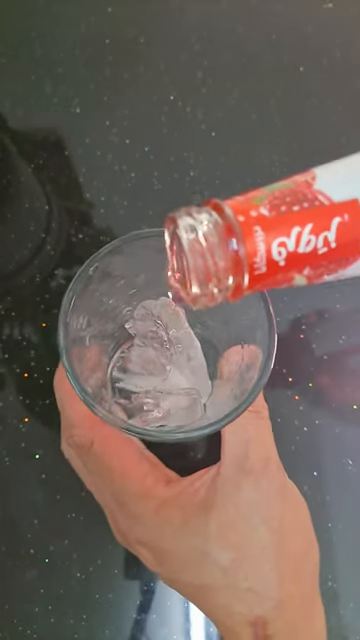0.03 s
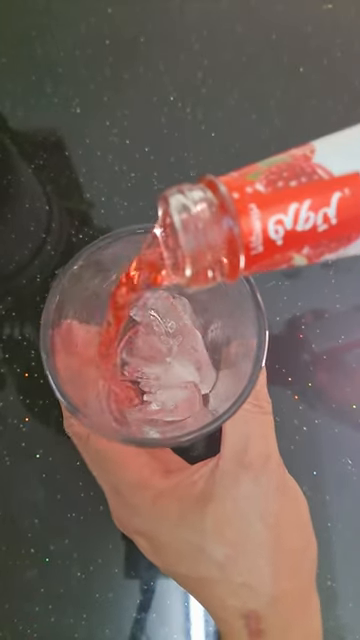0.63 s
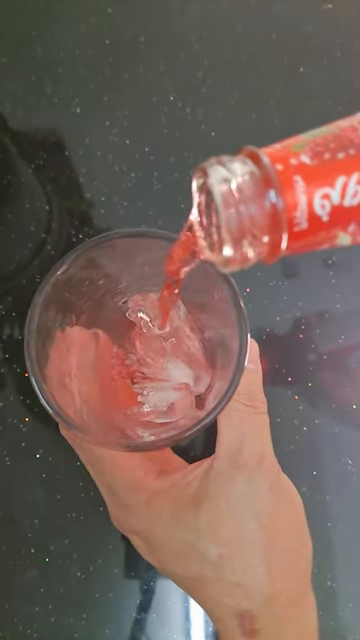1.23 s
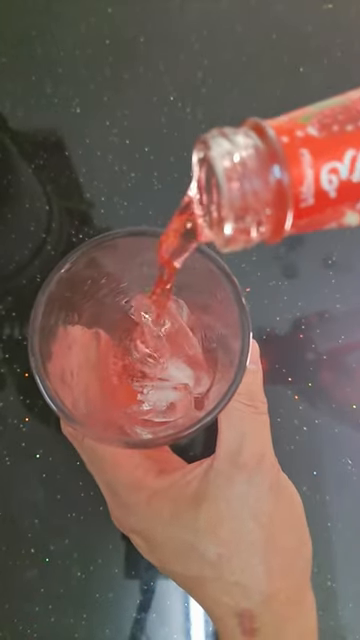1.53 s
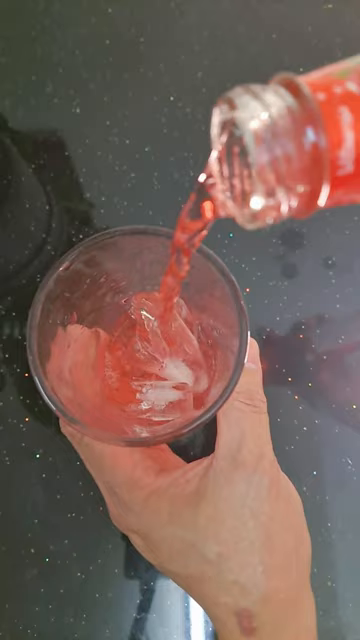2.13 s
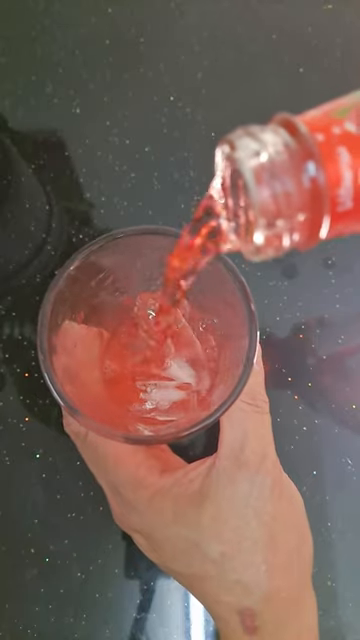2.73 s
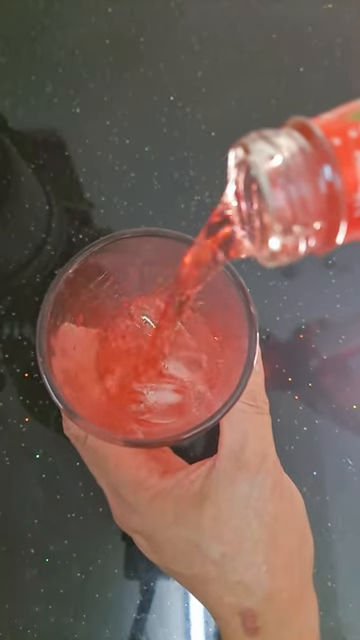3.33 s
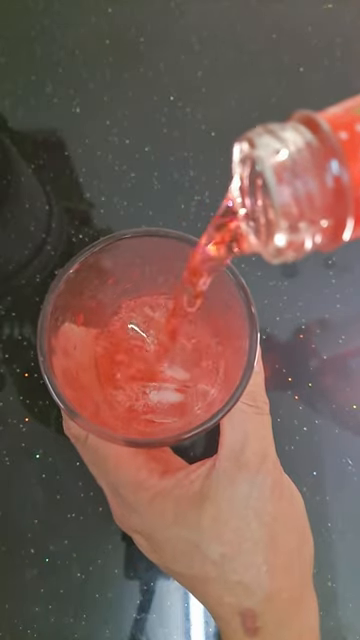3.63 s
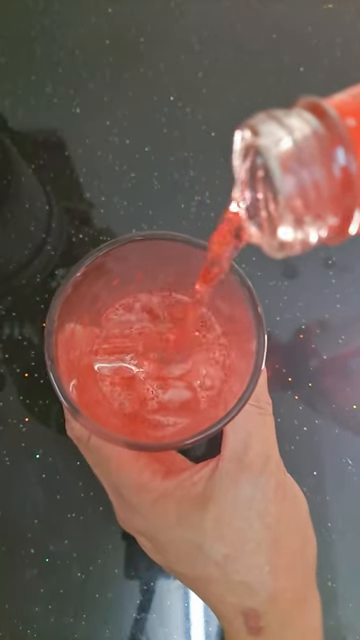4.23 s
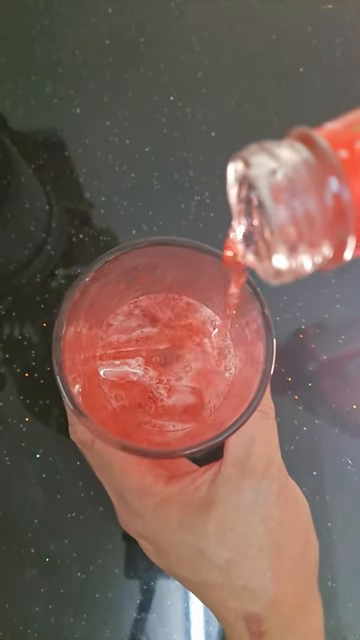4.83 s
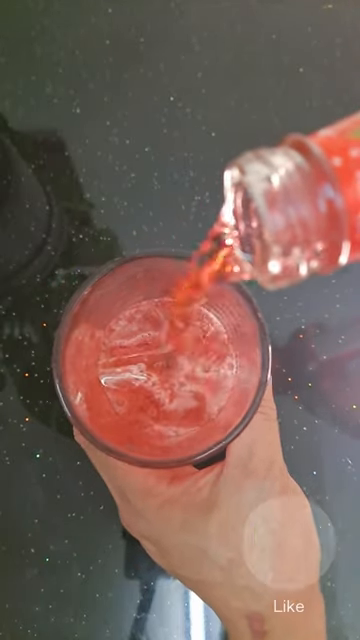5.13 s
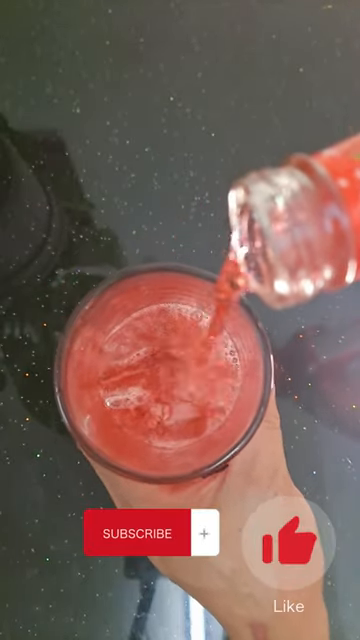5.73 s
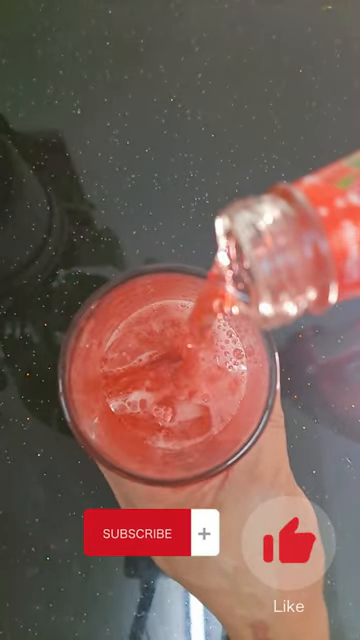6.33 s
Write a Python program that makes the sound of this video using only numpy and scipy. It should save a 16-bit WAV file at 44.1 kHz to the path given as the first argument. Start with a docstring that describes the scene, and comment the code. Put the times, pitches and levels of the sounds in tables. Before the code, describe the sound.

Close, uneven pouring of a soft drink into a glass of ice, with gurgles and fizz over a faint appliance hum.

```python
"""In a small room, a soft drink is poured in a thin, surging stream over ice into a hand-held glass.
Trapped air pockets ring as damped oscillators: large ones gurgle, tiny ones tick and fizz. Bubbles and
splashes drive the air column above the drink, whose resonances climb as the filling glass shortens it.
An appliance motor beats against the mains hum, and the walls add a brief reverberation."""
import sys
import numpy as np
from scipy import signal
from scipy.fft import rfft, irfft, next_fast_len
from scipy.io import wavfile
from scipy.ndimage import uniform_filter1d

SR = 44100
rng = np.random.default_rng(int(sys.argv[2]) if len(sys.argv) > 2 else 0)


def store_pcm(level_fs):
    """Save levels as 16-bit WAV."""
    pcm = np.round(np.clip(level_fs, -1, 1) * 32767).astype(np.int16)
    wavfile.write(sys.argv[1], SR, np.atleast_2d(pcm).T)


N = 280917

# prominent large bubbles: (time [s], level [dB], pitch [Hz], t60 [s])
LARGE_BUBBLES = [(0.5024, -13.5, 760, 0.034), (0.5127, -24, 880, .024), (0.5243, -33, 985, .04),
                 (0.5593, -33, 1210, .048), (0.61, -37, 1480, .06), (0.6765, -29, 1590, 0.016),
                 (0.698, -29.5, 1493, 0.04), (0.735, -30.5, 1526, 0.047), (0.829, -40, 850, .052),
                 (0.9428, -23, 823, 0.039), (0.9637, -22.5, 884, 0.043), (1.0667, -22.5, 848, 0.043),
                 (1.0945, -27.5, 820, 0.048), (1.196, -21.5, 843, 0.1), (1.2187, -20.5, 830.7, 0.12),
                 (1.234, -23, 840, 0.041), (1.3769, -31, 846, 0.025), (1.7802, -21, 894, 0.025),
                 (1.8849, -30, 883, .037), (1.897, -27, 883, .07), (1.9271, -20.5, 853, 0.022),
                 (2.791, -23.5, 960, 0.019), (2.8014, -20, 985, 0.029), (2.8444, -30, 915, .034),
                 (2.9387, -20, 1010, 0.017), (2.9906, -30, 963, 0.033), (3.179, -30, 967, 0.024),
                 (3.1999, -25.5, 1030, 0.0093), (3.6896, -17, 1117, .013), (3.979, -20, 970, 0.015),
                 (4.064, -15.5, 976, 0.014), (4.1284, -24.5, 990, .009), (4.3961, -15, 1202, 0.015),
                 (4.6248, -23.5, 885, 0.015), (4.6433, -19, 1160, 0.023), (4.7237, -24, 1410, .0095),
                 (4.814, -16, 1110, 0.009), (4.8985, -11.5, 1050, 0.0076), (4.918, -16, 1180, 0.022),
                 (4.9287, -15.5, 890, .01), (4.9454, -9, 1110, 0.0077), (4.9707, -19, 1320, .006),
                 (5.1871, -20.5, 1160, 0.008), (5.2051, -27.5, 907, 0.023), (5.2762, -23.5, 1390, 0.0042),
                 (5.3572, -23.5, 837, 0.016), (5.3585, -26.5, 412, 0.02), (5.7086, -22, 1460, 0.0093),
                 (5.8165, -30, 680, .032), (5.8428, -20, 1390, 0.0075), (5.8653, -21, 1230, .0045),
                 (5.942, -22, 1310, 0.014)]
# air column above ice and drink: (time [s], first resonance [Hz], second resonance [Hz])
COLUMN_MODES = [(.5, 780, 1490), (.78, 840, 1560), (.97, 822, 1830), (1.25, 785, 1940), (1.9, 880, 1990),
                (2.6, 940, 2400), (2.85, 1006, 2470), (3.25, 1060, 2550), (3.75, 1160, 2670),
                (4.4, 1235, 3040), (5, 1248, 3250), (5.7, 1430, 3630), (6.37, 1550, 3460)]
# faint noise of the room: (frequency [Hz], relative density [dB])
AMBIENT_SPECTRUM = [(59, -25), (100, -5.5), (177, -14), (306, -18), (448, -30), (566, -28.5), (863, -27),
                    (1210, -40), (1340, -33.5), (2050, -44), (2880, -52), (6420, -44.5), (7140, -42),
                    (7770, -41.5), (11000, -52), (15600, -53)]


def amp(db):
    """Amplitude ratio: a factor of ten for every 20 dB."""
    return 10 ** (np.asarray(db) / 20)


def along(points, hz):
    """Interpolation of (frequency [Hz], value) points on a logarithmic frequency axis."""
    f, v = np.transpose(points)
    return np.interp(np.log(hz + 1), np.log(f + 1), v)


def curves(rows):
    """Linear interpolation in time: one value per sample for each column after the first."""
    times, *columns = np.transpose(rows)
    return [np.interp(np.arange(N) / SR, times, column) for column in columns]


def filtered(x, response):
    """Linear filtering: the spectrum of x is multiplied by a frequency response."""
    size = next_fast_len(N + SR // 2)
    return irfft(rfft(x, size) * response(np.fft.rfftfreq(size, 1 / SR)), size)[..., :N]


def noise(spectrum):
    """Spectral shaping turns white noise into coloured noise of rms 1."""
    x = filtered(rng.standard_normal(N), lambda hz: amp(along(spectrum, hz)))
    return x / np.sqrt(np.mean(x ** 2) + 1e-20)


def resonate(x, hz, width_hz):
    """Forced response of a damped resonator of gain 1 whose centre may glide."""
    turn = np.exp(2j * np.pi * np.cumsum(hz * np.ones(N)) / SR)
    pole = np.exp(-np.pi * width_hz / SR)
    return 2 * (turn * signal.lfilter([1 - pole], [1, -pole], x / turn)).real


def place(times, sounds):
    """Superposition of short sounds, one a row, each from its own onset."""
    at = np.round(np.maximum(times, 0) * SR).astype(int) + np.arange(sounds.shape[1])
    return np.bincount(at.ravel(), sounds.ravel(), N)[:N]


def steady(x, span_s):
    """Division by the running rms holds the level near 1; faster grain stays."""
    size = int(span_s * SR) + 1
    power = np.abs(uniform_filter1d(uniform_filter1d(x ** 2, size), size))
    return x / np.sqrt(power + 0.058 * power.mean())


def motor_and_ambience():
    """Beating: motor and mains tones lie close in frequency, over a low rumble and faint hiss."""
    # motor and mains partials: (frequency [Hz], rms level [dB])
    partials = [(58.6, -42), (60.3, -36), (117.2, -48), (120, -47), (175.8, -57.5), (237, -58.5),
                (293, -56), (586, -69)]
    # low rumble: (frequency [Hz], relative density [dB])
    rumble_spectrum = [(18, -40), (27, -17), (40, -17.5), (54, 3.5), (72, 0.5), (92, -11), (110, -23.5),
                       (160, -37), (300, -88)]
    t = np.arange(N) / SR
    hum = sum(np.sqrt(2) * amp(db) * np.sin(2 * np.pi * (hz * t + rng.random())) for hz, db in partials)
    return hum + amp(-36) * noise(rumble_spectrum) + amp(-46.5) * noise(AMBIENT_SPECTRUM)


def flow_levels():
    """Incoherent sources add in power: surges over a trickle give gurgle, splash and fizz levels in dB."""
    # surges of the uneven stream: (start [s], length [s], gurgle [dB], splash [dB], fizz [dB])
    surges = [(0.444, 0.058, -46, -58, -47), (0.524, 0.15, -44, -51, -53), (0.67, 0.15, -44, -59, -60),
              (0.939, 0.042, -36, -40.5, -46), (1.034, 0.11, -41.5, -48.5, -51),
              (1.202, 0.03, -46.5, -38.5, -50), (1.701, 0.082, -51, -49, -53),
              (1.881, 0.022, -37, -37.5, -36.5), (2.135, 0.084, -50, -61, -60),
              (2.593, 0.022, -66, -50, -71), (2.761, 0.15, -44, -51.5, -50.5), (2.99, 0.11, -47, -50, -55),
              (3.127, 0.10, -44, -47.5, -59), (3.451, 0.13, -54, -61, -54.5),
              (3.636, 0.09, -54.5, -52, -51.5), (3.841, 0.051, -50, -60, -58),
              (3.972, 0.15, -41, -65.5, -61), (4.352, 0.04, -45.5, -68, -51), (4.404, 0.16, -38, -52, -51),
              (4.601, 0.20, -39, -49.5, -55.5), (4.81, 0.073, -40.5, -47.5, -61.5),
              (4.895, 0.11, -35, -47, -54), (5.184, 0.097, -45, -52, -53), (5.343, 0.091, -44, -56, -54),
              (5.546, 0.04, -45.5, -51.5, -59), (5.698, 0.06, -45, -50, -52), (5.81, 0.044, -35, -51, -64),
              (5.906, 0.088, -49.5, -50.5, -61), (6.314, 0.05, -47, -62, -65)]
    # thin stream between the surges: (time [s], gurgle [dB], splash [dB], fizz [dB])
    trickle = [(0.42, -79, -85, -78), (0.55, -55, -68, -61), (1.3, -56, -73, -64.5), (2.5, -70, -81, -63.5),
               (3.35, -67.5, -68, -63), (3.8, -51, -61, -55.5), (5.1, -57.5, -60.5, -55),
               (5.9, -51, -61, -55), (6.37, -59, -61.5, -58)]
    attack_s, sag_db_per_s = 0.007, 26.5  # a surge lands at once and weakens while it lasts
    release_db_per_s = (175, 229, 264)  # gurgle, splash, fizz
    t = np.arange(N) / SR
    power = amp(curves(trickle)) ** 2
    for start, length, *db in surges:
        on = (t > start) & (t < start + length + 0.5)
        age = t[on] - start
        release_db = np.outer(release_db_per_s, np.maximum(age - length, 0))
        fall_db = sag_db_per_s * (age - length / 2) + release_db
        power[:, on] += (np.minimum(age / attack_s, 1) * amp(np.array(db)[:, None] - fall_db)) ** 2
    return 10 * np.log10(power)


def ring(times, db, hz, t60, swell, rise, samples):
    """Damped bubble oscillation: each swells for a share of its t60 and decays as its pitch rises."""
    t = np.arange(samples) / SR
    envelope = (1 - np.exp(-t / (swell * t60))) * amp(-60 * t / t60)
    envelope /= envelope.max(axis=1, keepdims=True)
    gliding_hz = hz * (1 + rise * (np.minimum(t / t60, 1) - 1 / 5))
    phase = 2 * np.pi * np.cumsum(gliding_hz, axis=1) / SR
    return place(times, amp(db) * envelope * np.sin(phase))


def swarm(per_s, hz, spread, cycles, scatter_db):
    """Random superposition of bubbles, scattered in onset, pitch, decay time and level."""
    draw = np.clip(rng.standard_normal((int(per_s * N / SR), 3, 1)), -2, 2)
    times = rng.uniform(0, N / SR, (len(draw), 1))
    pitch = hz * np.exp(spread * draw[:, 0])
    t60 = cycles / pitch * 2 ** (draw[:, 1] / 2)
    return ring(times, scatter_db * draw[:, 2], pitch, t60, swell=0.032, rise=0.022, samples=800)


def column_strength():
    """A shallow cavity resonates weakly: the air column fades once the ice is covered."""
    return np.interp(np.arange(N) / SR, [3.1, 4.4], [1, 0.27])


def upper_modes(x, direct):
    """Cavity modes: the column's second resonance follows the filling; those across the glass stay put."""
    # resonances across the glass: (frequency [Hz], bandwidth [Hz], gain [dB])
    cross_modes = [(1955, 73, -6), (3480, 110, 1), (4860, 390, -11.5)]
    second = column_strength() * resonate(x, curves(COLUMN_MODES)[1], width_hz=160)
    return direct * x + second + sum(amp(db) * resonate(x, hz, width) for hz, width, db in cross_modes)


def stream(gurgle_db, splash_db, fizz_db):
    """Air entrainment: the stream traps swarms of bubbles, which drive the air in the glass."""
    # hiss of the froth: (frequency [Hz], relative density [dB])
    froth_spectrum = [(2500, -16), (3700, -12), (5000, 4), (6200, -0.5), (7800, -4), (9700, -11.5),
                      (11000, -23.5)]
    first_hz, second_hz = curves(COLUMN_MODES)
    strength = column_strength()
    large = swarm(per_s=280, hz=1150, spread=0.28, cycles=9.5, scatter_db=5.0)
    pockets = swarm(per_s=200, hz=410, spread=0.32, cycles=5.1, scatter_db=0.5)
    column = resonate(large, first_hz, width_hz=78)
    column += 0.83 * strength * resonate(large, second_hz, width_hz=87)
    # only a deep drink swallows big pockets of air
    gurgle = 0.2 * large + 0.19 * (1 - strength) * pockets + np.sqrt(strength) * column
    small = swarm(per_s=620, hz=2600, spread=0.25, cycles=21, scatter_db=4.5)
    splash = upper_modes(small, direct=0.14)
    tiny = swarm(per_s=750, hz=5836, spread=0.219, cycles=60, scatter_db=8.5)
    pops = steady(tiny + 0.27 * upper_modes(tiny, direct=0), span_s=0.26)
    froth = np.linspace(0.35, 0.62, N) * noise(froth_spectrum)  # froth builds up around the pops
    return (amp(gurgle_db - 0.42) * steady(gurgle, span_s=0.035)
            + amp(splash_db - 2.4) * steady(splash, span_s=0.035)
            + amp(fizz_db) * (0.57 * pops + froth))


def ticks(fizz_db):
    """Constant Q: small bubbles ring for the same number of cycles, so the highest are the briefest."""
    # clearest small bubbles: (time [s], level [dB], pitch [Hz])
    clear_ticks = [(0.4759, -22, 4710), (0.5088, -28, 4570), (0.6434, -30.5, 6740), (0.662, -35, 4000),
                   (0.9405, -31, 6500), (0.9672, -30, 1893), (1.0987, -30.5, 2000), (1.114, -31.5, 2010),
                   (1.215, -29, 6360), (1.2322, -30.5, 1780), (1.7815, -19.5, 2020), (1.898, -27.5, 1947),
                   (1.9108, -26.5, 2070), (2.3276, -39, 5300), (2.6086, -34.5, 7900), (2.6104, -41, 2400),
                   (2.7664, -36, 2480), (2.898, -26, 6660), (2.9947, -35, 2440), (3.0232, -36, 2770),
                   (3.0605, -36, 2330), (3.227, -37, 2640), (3.6445, -32, 6300), (4.1533, -30, 6600),
                   (4.3561, -33.5, 5030), (4.441, -29, 6500), (4.8987, -29, 1825), (4.9188, -32.5, 5150),
                   (4.9703, -28, 1920), (5.19, -29.5, 5050), (5.6997, -26, 6200)]
    strays_per_s, cycles = 12, 46
    at = rng.integers(0, N, int(strays_per_s * N / SR))
    draw = np.clip(rng.standard_normal((len(at), 2)), -2, 2)
    stray_db = fizz_db[at] + 10 + 2.5 * draw[:, 0]  # stray ticks stand out above the fizz
    stray_hz = 6000 * np.exp(0.15 * draw[:, 1])
    strays = np.column_stack([at / SR, stray_db, stray_hz])
    times, db, hz = np.vstack([clear_ticks, strays]).T[:, :, None]
    tone = ring(times, db - 0.3, hz, cycles / hz, swell=0.062, rise=0.02, samples=1500)
    return tone + 0.22 * upper_modes(tone, direct=0)


def large_bubbles():
    """Minnaert resonance: each large bubble pulsates and drives the air column's first mode."""
    times, db, hz, t60 = np.array(LARGE_BUBBLES).T[:, :, None]
    tone = ring(times, db - 0.7, hz, t60, swell=0.19, rise=0.0078, samples=4500)
    return tone + 0.14 * column_strength() * resonate(tone, curves(COLUMN_MODES)[0], width_hz=71)


def splashes():
    """Impulse excitation: spray from each slap and large bubble's pinch-off rings the air in the glass."""
    # gulps that slap hard on ice or drink: (time [s], level [dB])
    slaps = [(0.9428, -29), (0.9637, -33), (1.705, -43), (1.7797, -37), (1.8849, -37), (1.897, -32),
             (2.1823, -36.5), (2.9387, -37.5), (2.9913, -42), (3.6893, -37), (3.979, -38), (4.063, -35),
             (4.276, -46), (4.4387, -43), (4.4868, -43), (4.6248, -42), (4.6429, -34), (4.9705, -37),
             (5.057, -46), (5.1867, -31.5), (5.2051, -40), (5.2572, -44), (5.7076, -44), (5.8422, -43),
             (5.9417, -44)]
    # splash on ice: (frequency [Hz], gain [dB])
    ice_colour = [(500, -25), (1800, 0), (6000, -3), (8500, -12), (12000, -35)]
    # duller splash on open drink: (frequency [Hz], gain [dB])
    drink_colour = [(500, -18), (1700, 1), (2700, 3), (4000, -1), (6000, -5), (12000, -39)]
    rise_s, t60_s = 0.0008, 0.032
    # a louder bubble pinches off with a louder splash
    pinches = [(time, -50 + 0.41 * (db + 25)) for time, db, *_ in LARGE_BUBBLES]
    times, db = np.array(slaps + pinches).T[:, :, None]
    t = np.arange(900) / SR
    envelope = (1 - np.exp(-t / rise_s)) * amp(-60 * t / t60_s)
    bursts = place(times, amp(db + 14.5) * envelope * rng.standard_normal((len(times), len(t))))
    on_ice = filtered(bursts, lambda hz: amp(along(ice_colour, hz)))
    on_drink = filtered(bursts, lambda hz: amp(along(drink_colour, hz)))
    covered = np.interp(np.arange(N) / SR, [2.4, 3.7], [0, 1])  # the drink rises over the ice
    return upper_modes((1 - covered) * on_ice + covered * on_drink, direct=0.33)


def reverberation(x):
    """Wall reflections merge into an exponentially decaying tail whose treble dies first."""
    # reverberation time of the room: (frequency [Hz], t60 [s])
    decay_times = [(300, 0.26), (2000, 0.2), (10000, 0.094)]
    hz, t, spectrum = signal.stft(rng.standard_normal(SR // 2), SR, nperseg=256)
    decay = amp(-60 * t / along(decay_times, hz)[:, None])
    tail = signal.istft(spectrum * decay, SR, nperseg=256)[1]
    return signal.fftconvolve(np.pad(x, (200, 0)), tail / np.linalg.norm(tail))[:N]


def side_gain(hz):
    """Interaural coherence: the less alike the two ears, the stronger the side signal."""
    # nominal likeness of left and right: (frequency [Hz], coherence [0-1])
    likeness = [(2000, 1), (4000, 0.98), (6000, 0.84), (8000, 0.91), (11000, 0.78)]
    coherence = along(likeness, hz)
    return np.sqrt(np.clip((1 - coherence) / (1 + coherence), 0, 1))


def scene():
    """Mid-side stereo: the glass is close and straight ahead; only high hiss and reverberation spread."""
    background = motor_and_ambience()
    gurgle_db, splash_db, fizz_db = flow_levels()
    drink = stream(gurgle_db, splash_db, fizz_db) + ticks(fizz_db) + large_bubbles() + splashes()
    mid = background + drink + amp(-12) * reverberation(drink)
    diffuse = amp(-38.5) * noise(AMBIENT_SPECTRUM) + amp(-15) * reverberation(drink)
    side = filtered(diffuse, side_gain)
    return np.array([mid + side, mid - side])


def record(dry):
    """Band limiting: the microphone loses the deepest bass, and nothing passes above the top frequency."""
    bass_hz, top_hz = 36, 15650
    return filtered(dry, lambda hz: (hz < top_hz) * np.minimum(hz / bass_hz, 1) ** 4)


dry = scene()
out = record(dry)
store_pcm(out)
```